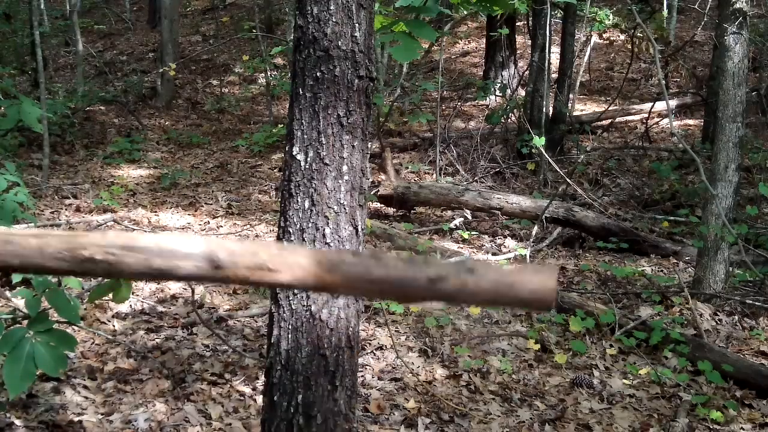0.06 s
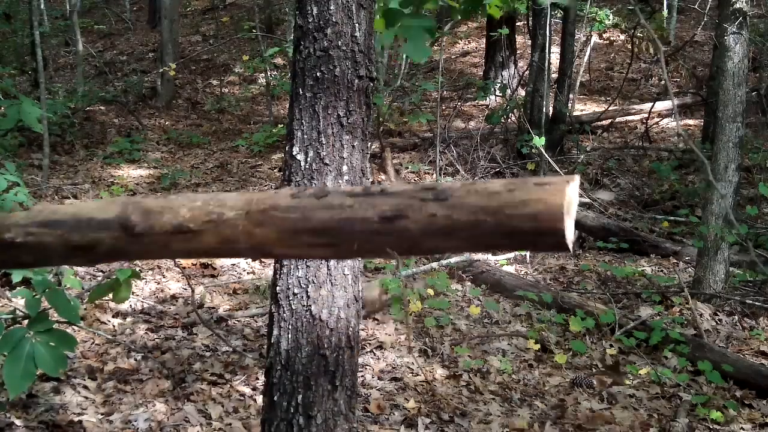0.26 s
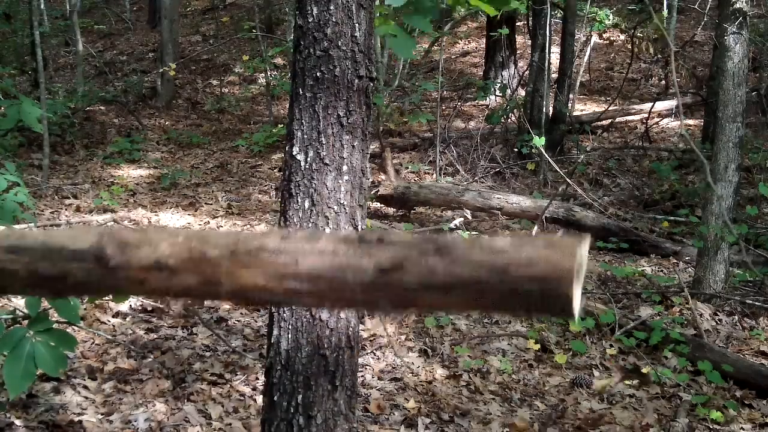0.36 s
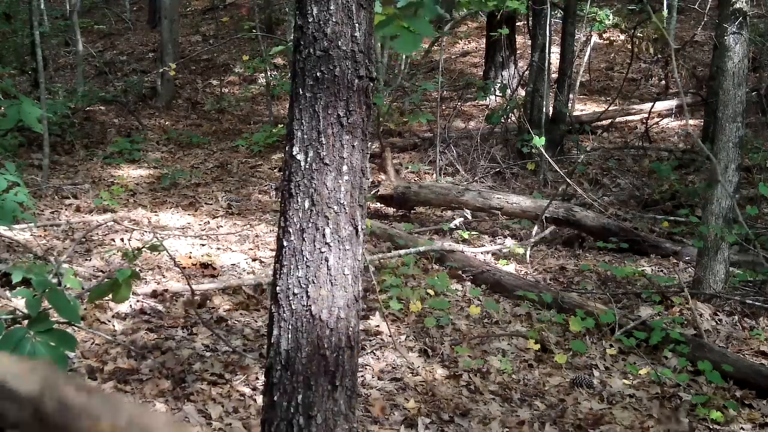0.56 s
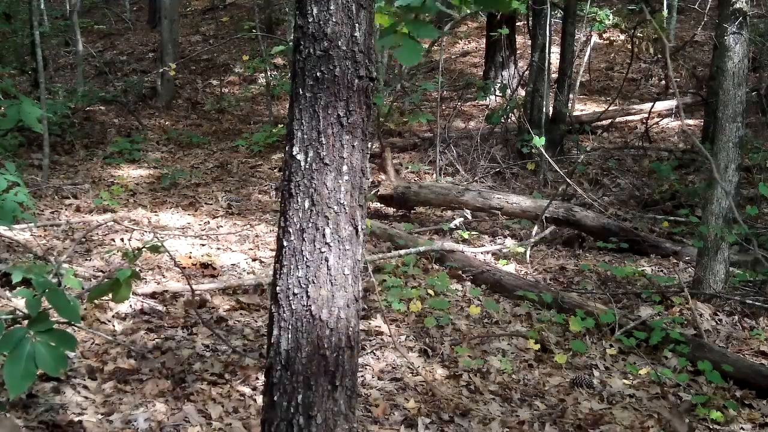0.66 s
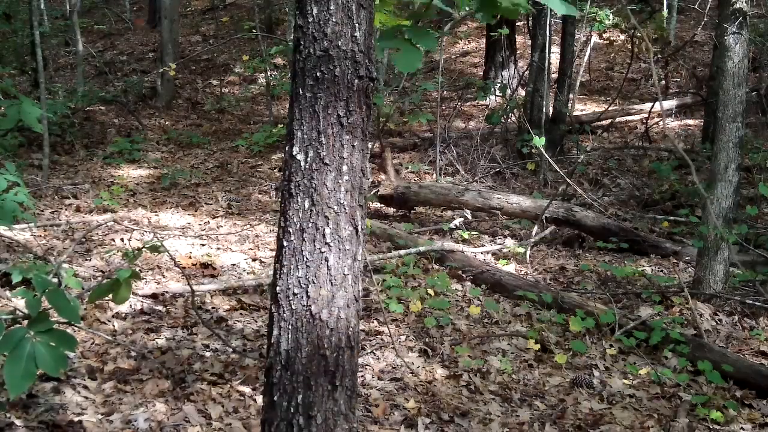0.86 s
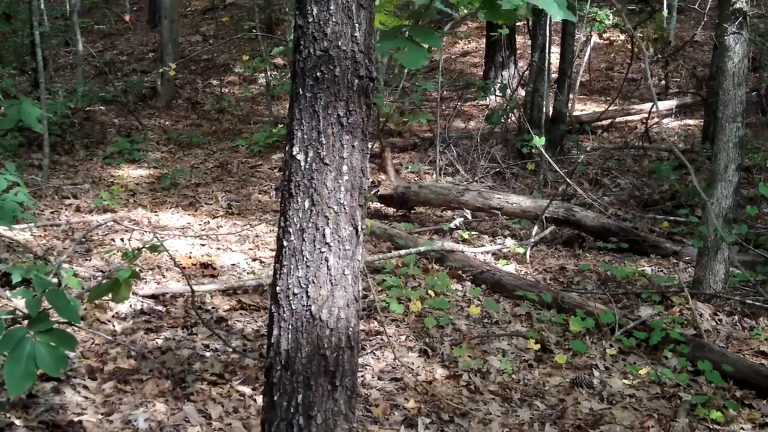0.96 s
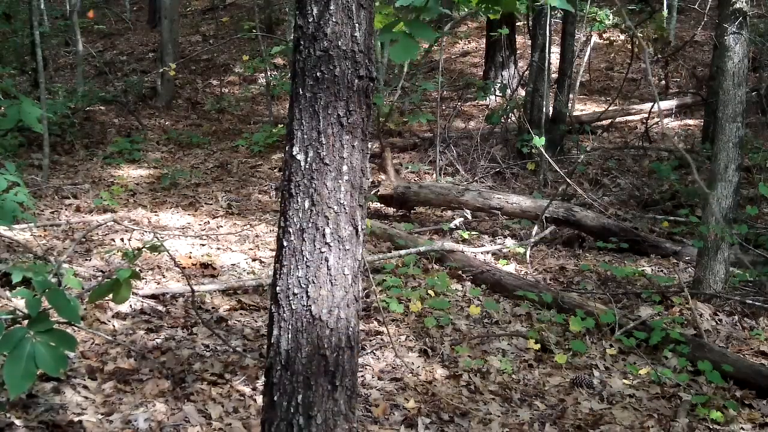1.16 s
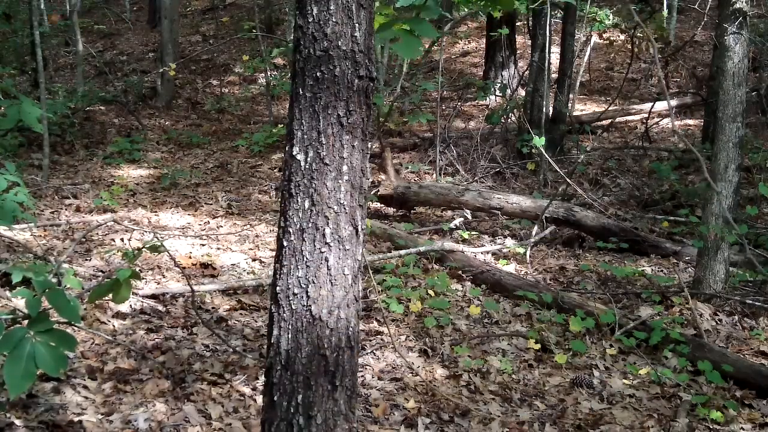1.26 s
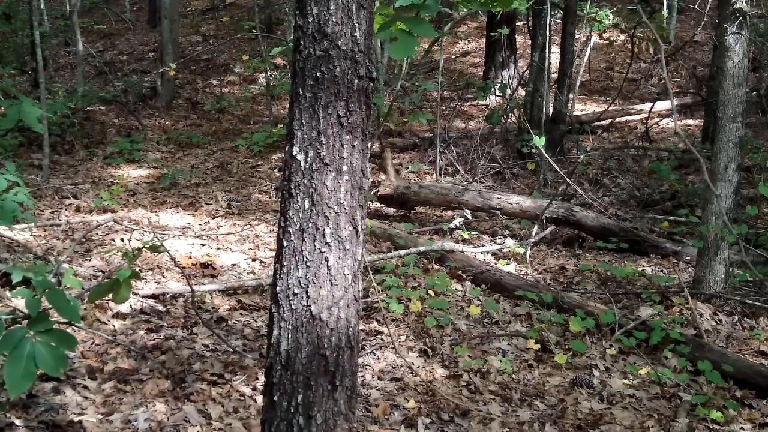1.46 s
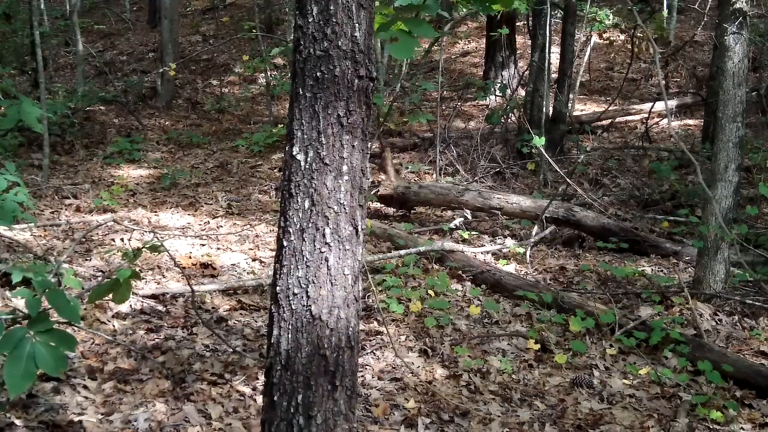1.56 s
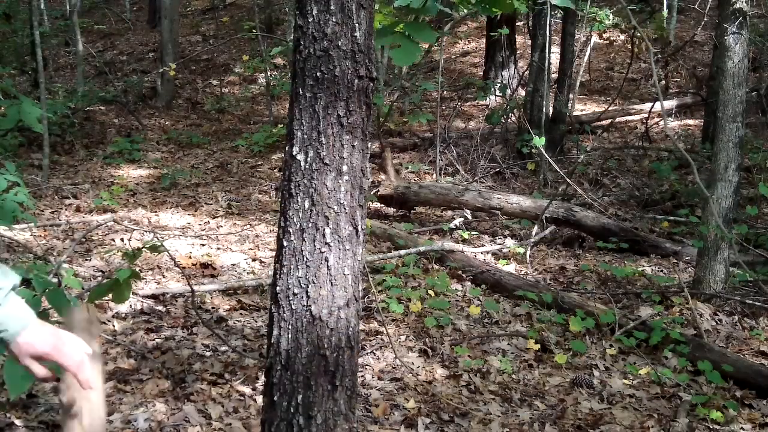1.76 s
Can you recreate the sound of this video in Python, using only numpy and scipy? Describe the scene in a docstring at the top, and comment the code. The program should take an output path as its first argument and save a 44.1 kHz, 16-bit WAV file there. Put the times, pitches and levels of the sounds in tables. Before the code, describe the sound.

One sharp wooden whack, close to the microphone, as a log strikes a tree and crunches the bark. The forest throws back a short echo, with a soft scuffing knock just after and faint ticks of twigs and leaves.

```python
"""One hard, woody whack, close up, and the forest throws it back: a sawn log swung against a tree trunk.
The bark crunches, the log's modes ring briefly, the trunk shudders and the microphone overloads.
Then the log drops with a scuff and a small damped knock. Dry leaves and twigs rustle and tick,
as swarms of tiny fractures and single snaps, over a faint forest hiss."""
import sys
import numpy as np
from scipy import signal
from scipy.fft import rfft, irfft
from scipy.io import wavfile

SR = 44100
rng = np.random.default_rng(int(sys.argv[2]) if len(sys.argv) > 2 else 0)


def transcribe(u):
    """Save the signal u as a 16-bit wav file named by the first command-line argument.

    u: samples, shape (n,) or (channels, n), limited to [-1, 1]; the rate is SR.
    q: integer samples, one column per channel.
    """
    v = np.clip(np.atleast_2d(u).T, -1, 1)
    q = np.round(v * 32767).astype(np.int16)
    wavfile.write(sys.argv[1], SR, q)


N = 79380
T = np.arange(N) / SR

WHACK_S = .2339
THUD_HZ, THUD_T60_S = 556, 0.011  # dull body under the whack and the knocks

# tone of cracking bark: f/Hz, level/dB
CRACK_SPECTRUM = [(100, -13.5), (350, -7.5), (800, -4), (1150, -4), (1700, 1), (2400, 0), (2900, 0),
                  (4000, -2.5), (5200, -20.5), (8000, -32.5), (15000, -38.5)]
# decay of the reverb among the trees: f/Hz, t60/s
FOREST_DECAY = [(60, 0.13), (250, 0.13), (550, 1), (1400, 1), (3500, 0.3), (8000, 0.99), (15000, .3)]


def amp(db):
    """Decibels to gain."""
    return 10 ** (np.asarray(db) / 20)


def read(points, hz):
    """Reads a table on a log-frequency axis."""
    f, value = np.transpose(points)
    return np.interp(np.log(hz + 1), np.log(f + 1), value)


def add(mix, s, sound):
    """Mixes a sound in at time s."""
    part = mix[max(round(s * SR), 0):][:len(sound)]
    part += sound[:len(part)]


def low_cut(x, hz, order=2):
    """Rolls off the bass below hz."""
    return signal.sosfilt(signal.butter(order, hz, "high", fs=SR, output="sos"), x)


def high_cut(x, hz):
    """Rolls off the treble above hz."""
    return signal.sosfilt(signal.butter(2, hz, fs=SR, output="sos"), x)


def colour(x, points):
    """EQs a noise to a table of relative levels, trims the sub-bass and scales to an rms of one."""
    hz = np.fft.rfftfreq(len(x), 1 / SR)
    shaped = irfft(rfft(x) * amp(read(points, hz)) * hz / np.hypot(hz, 25), len(x))
    return shaped / np.sqrt(np.mean(shaped ** 2) + 1e-20)


def grains(per_s, spread_db):
    """A random train of tiny fractures of uneven size."""
    size = amp(spread_db * np.minimum(rng.exponential(1, N), 4))
    return rng.standard_normal(N) * size * (rng.random(N) < per_s / SR)


def burst(hold_s, t60_s, rise_s=.0001):
    """Envelope with an attack, a hold and an exponential release."""
    return np.minimum(T / rise_s, 1) * amp(-60 * np.maximum(T - hold_s, 0) / t60_s)


def mode(hz, t60_s):
    """One dying vibration."""
    return np.sin(2 * np.pi * hz * T) * amp(-60 * T / t60_s)


def scatter(spectrum, decay, build_s):
    """Echo response of many trunks: sparse taps, coloured, each band dying at its own speed."""
    taps = colour(rng.choice([-1., 1.], N) * (rng.random(N) < 4000 / SR), spectrum)
    hz, t, bands = signal.stft(taps, SR, nperseg=256)
    fade = amp(-60 * t / read(decay, hz)[:, None])
    tail = signal.istft(bands * fade, SR, nperseg=256)[1][:N]
    tail *= 1 - np.exp(-(T / build_s) ** 2)
    return tail / np.linalg.norm(tail)


def forest_hiss():
    """A faint, steady bed of forest air."""
    # tone of the hiss: f/Hz, level/dB
    spectrum = [(30, 6.5), (70, -5), (130, -9), (420, -7), (560, -7), (800, -6), (1100, -9.5), (1450, -6),
                (2000, -11), (2800, -11.5), (3500, -1), (4400, -10.5), (6000, -15.5), (7700, -24),
                (10000, -20.5), (15500, -27)]
    return amp(-62.5) * colour(rng.standard_normal(N), spectrum)


def rustle():
    """Dense grains of dry leaves and clothing that swell with the movement."""
    # level ride as the log is swung and carried: t/s, level/dB
    ride = [(0, -66.5), (.05, -52), (.09, -67), (.18, -56.5), (.228, -51), (.3, -61.5), (.6, -74),
            (1.05, -62.5), (1.11, -69), (1.25, -65.5), (1.35, -70.5), (1.45, -62), (1.58, -59),
            (1.67, -51.5), (1.755, -51.5), (1.785, -44.5)]
    # tone of the rustle: f/Hz, level/dB
    spectrum = [(40, -10), (200, -13), (600, -6), (1000, -6.5), (1500, 1), (2300, -0.5), (3600, -3),
                (5500, -10), (7800, -20), (10500, -21.5), (16000, -29.5)]
    level_db = np.interp(T, *np.transpose(ride))
    return amp(level_db) * colour(grains(per_s=7100, spread_db=1.5), spectrum)


def woods(x):
    """Adds the space: reverb from trees and undergrowth, a distant wash and two early reflections."""
    # tone of the reverb from the trees around: f/Hz, level/dB
    trees = [(40, -5), (110, -4), (260, -8), (550, -7), (900, -4), (1500, -6.5), (2300, -3), (3500, 9),
             (6000, -9.5), (15000, -16)]
    # tone of the close scatter from the undergrowth: f/Hz, level/dB
    undergrowth = [(250, 1), (900, -0.5), (2300, -4.5), (4200, 3), (7000, -18.5), (15000, -26)]
    # its quick decay: f/Hz, t60/s
    undergrowth_decay = [(300, 0.098), (1500, 0.16), (4000, 0.073), (8000, 0.12)]
    # tone of the dull wash from distant trees: f/Hz, level/dB
    far_trees = [(250, -13), (450, -6), (557, -0.5), (750, -3.5), (1500, -3.5), (2500, -4.5), (6000, -8.5)]
    # slaps off the ground and nearby trunks: delay/s, level/dB
    reflections = [(.008, -15), (0.0289, -35.5)]
    response = amp(-32) * scatter(trees, FOREST_DECAY, build_s=.015)
    response += amp(-22) * scatter(undergrowth, undergrowth_decay, build_s=0.0063)
    response += amp(-43.5) * scatter(far_trees, [(1000, 3.2)], build_s=.18)  # one t60 for all bands
    out = x + signal.fftconvolve(x, response)[:N]
    dulled = high_cut(x, hz=4500)  # leaf litter and bark swallow the treble
    for delay_s, db in reflections:
        add(out, delay_s, amp(db) * dulled)
    return out


def twigs():
    """Twigs and dry leaves snap, each a sharp click with a tiny pitched ring."""
    # snaps: t/s, level/dB, f/Hz, t60/s, click against ring/dB
    snaps = [(0.0217, -29, 2600, 0.0017, -11), (0.0495, -35, 1850, 0.007, -11),
             (.104, -46, 1850, .008, -15), (0.4882, -35.5, 3500, 0.0061, -26.5), (0.34, -41, 1750, .012, 1),
             (.968, -48.5, 1310, 0.023, -14), (0.85, -44, 4500, 0.0021, 6), (.826, -52, 5140, 0.0047, 9),
             (1.1425, -34.5, 2135, .003, -29), (1.197, -39.5, 3850, 0.0095, -12)]
    out = np.zeros(N)
    for s, db, hz, t60_s, click_db in snaps:
        click = amp(click_db) * rng.standard_normal(N) * np.exp(-T / .0003)
        snap = mode(hz, t60_s) + high_cut(click, hz=7997)
        add(out, s, amp(db) * low_cut(snap, hz=700))
    return out


def scuffs():
    """Bark and leaf litter scrape in short, gritty bursts."""
    # scrapes: t/s, level/dB, hold/s, t60/s
    scrapes = [(0.026, -71, 0.014, 0.025), (.468, -40.5, 0.015, 0.16), (.966, -57, 0.0087, 0.031),
               (1.193, -51.5, 0.0026, 0.051)]
    # tone of a scuff: f/Hz, level/dB
    spectrum = [(40, -17), (160, 0), (600, 5.5), (1000, 0), (1500, 7.5), (2500, -0.5), (4500, -4.5),
                (7500, -24.5), (11000, -22), (16000, -31)]
    out = np.zeros(N)
    for s, db, hold_s, t60_s in scrapes:
        grit = colour(grains(per_s=4300, spread_db=2.5), spectrum)
        add(out, s, amp(db) * grit * burst(hold_s, t60_s, rise_s=hold_s / 2))
    return out


def log_ring(contact_s, damping):
    """A force pulse rings the log's modes: a longer contact is duller, more damping is drier."""
    # modes of the log: f/Hz
    pitches = [260, 380, 557, 742, 905, 1120, 1395, 1488, 1889, 2116, 2215, 2405, 3378, 3750, 5200]
    # ring of each mode at a damping of one: level/dB, t60/s
    rings = [(-19.5, 0.054), (-8.5, 0.027), (-16, 0.11), (-20.5, 0.023), (-19.5, 0.075), (-21.5, .05),
             (-9.5, 0.046), (-5, 0.035), (-9.5, 0.032), (-14, 0.059), (-9.5, 0.058), (-6, 0.043),
             (-19.5, .03), (-16, 0.018), (-15.5, .014)]
    modes = sum(amp(db) * mode(hz, t60 / damping) for hz, (db, t60) in zip(pitches, rings))
    force = T * np.exp(-2 * np.pi * T / contact_s)
    return signal.fftconvolve(modes, force / force.sum())[:N]


def knocks():
    """The held log drops: two light, choked contacts that blend into one knock."""
    # contacts: t/s, level/dB, contact time/s
    contacts = [(0.4803, -32, 0.00042), (0.486, -31.5, 0.00079)]
    out = np.zeros(N)
    for s, db, contact_s in contacts:
        knock = log_ring(contact_s, damping=4.8) + amp(-5.5) * mode(THUD_HZ, THUD_T60_S)
        add(out, s, amp(db) * low_cut(knock, hz=205))
    return out


def whack_tail():
    """Trunk and ground shudder, and the crack thrown sideways comes back from the trees."""
    # low rumble of the shudder: f/Hz, level/dB
    rumble = [(30, 0.5), (85, -0.5), (150, -8), (400, -42), (2000, -81)]
    shudder = amp(-37.5) * colour(rng.standard_normal(N), rumble) * burst(hold_s=0, t60_s=0.24)
    crack_echo = amp(-6) * scatter(CRACK_SPECTRUM, FOREST_DECAY, build_s=.03)
    out = np.zeros(N)
    add(out, WHACK_S, shudder + crack_echo)
    return out


def whack():
    """The main hit: a dull push of the trunk, then the log rings, bark crunches and flakes crack on."""
    # tone of crushed bark: f/Hz, level/dB
    bark = [(100, -24), (350, 3), (2300, 5), (2900, -3), (4000, 0), (6000, -15.5), (10500, -18),
            (16000, -26.5)]
    give_s = 0.0014  # the bark gives way before wood meets wood
    thud = amp(4) * mode(THUD_HZ, THUD_T60_S)
    ring = amp(2.5) * log_ring(contact_s=0.00027, damping=1)
    crunch = amp(-3) * colour(grains(per_s=7500, spread_db=-7.0), bark)
    crunch *= burst(hold_s=0.0015, t60_s=.013)
    flakes = amp(-18.5) * colour(grains(per_s=13000, spread_db=4.5), CRACK_SPECTRUM)
    flakes *= burst(hold_s=0, t60_s=0.071)
    out = np.zeros(N)
    add(out, WHACK_S, thud)
    add(out, WHACK_S + give_s, ring + crunch + flakes)
    return low_cut(out, hz=205, order=5)  # little bass radiates


def scene():
    """Mono mix: the whack and the handling sounds in the woods, over rustle and hiss."""
    hiss = forest_hiss()
    hits = whack() + knocks() + scuffs() + twigs()
    return (woods(hits) + whack_tail() + rustle() + hiss)[None]


def record(dry):
    """The microphone saturates on the whack and sheds bass; a soft limiter and a steep low-pass follow."""
    ceiling, top_hz = 1.7, 16000
    saturated = low_cut(ceiling * np.tanh(dry / ceiling), hz=90)
    limited = saturated / (1 + saturated ** 12) ** (1 / 12)
    low_pass = signal.firwin(511, top_hz, window=("kaiser", 9), fs=SR)
    return signal.oaconvolve(limited, low_pass[None], "same")


dry = scene()
out = record(dry)
transcribe(out)
```